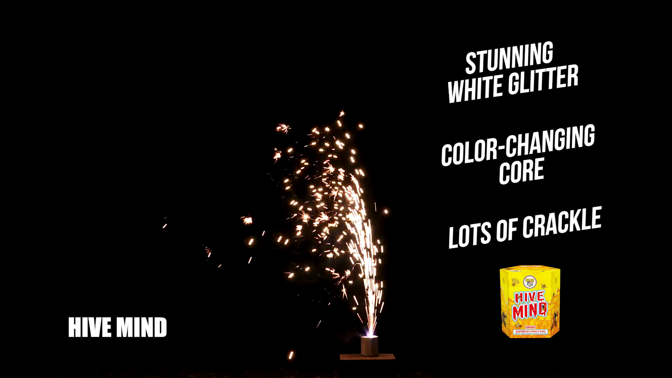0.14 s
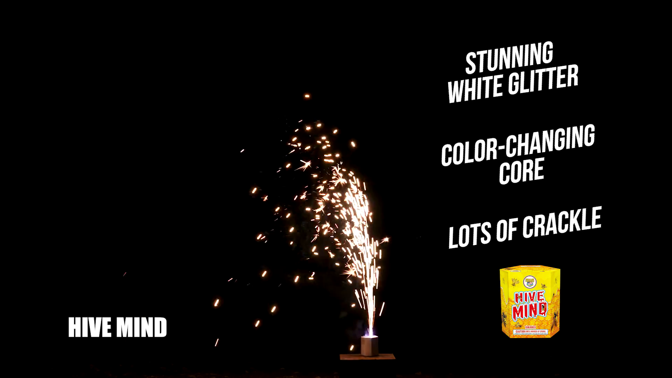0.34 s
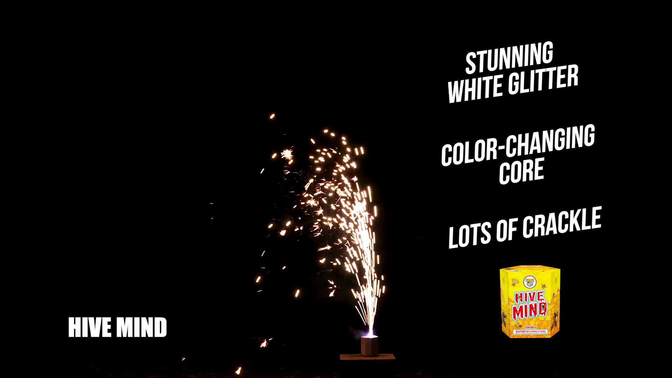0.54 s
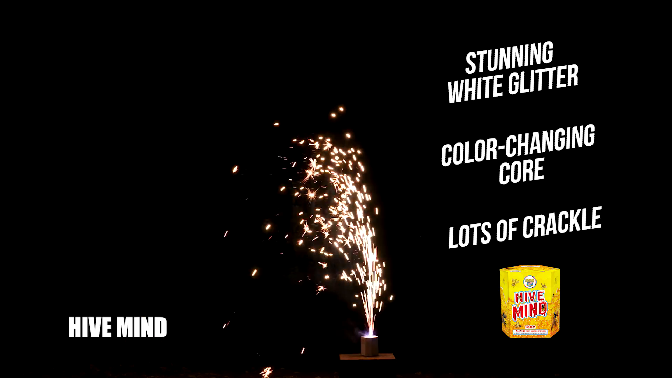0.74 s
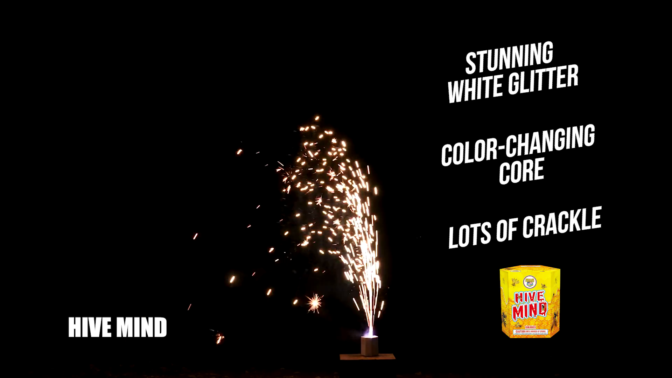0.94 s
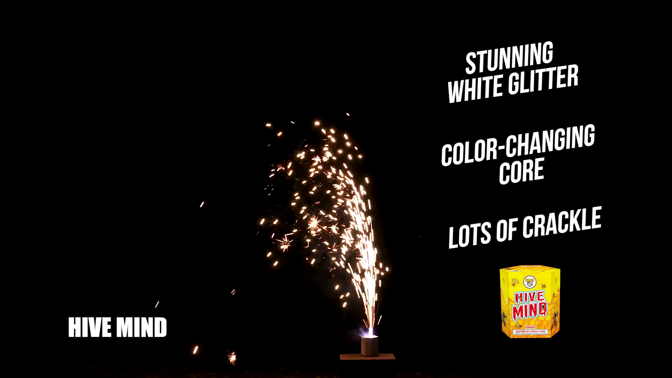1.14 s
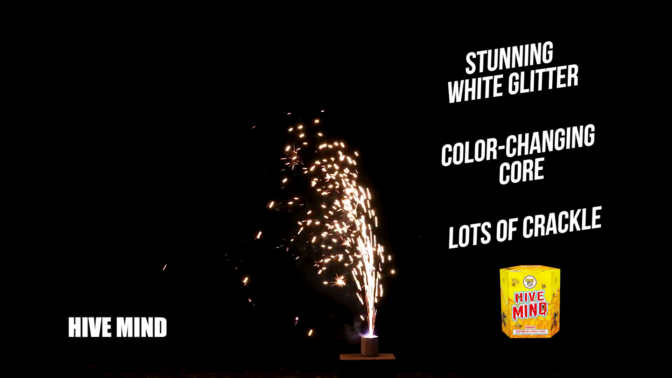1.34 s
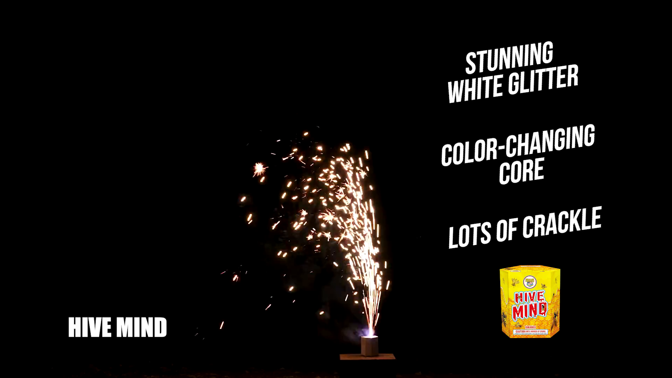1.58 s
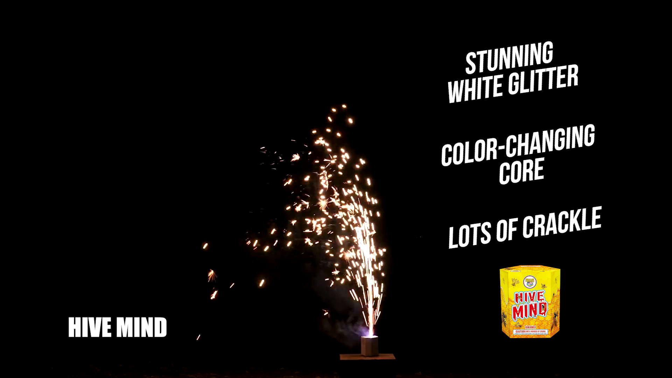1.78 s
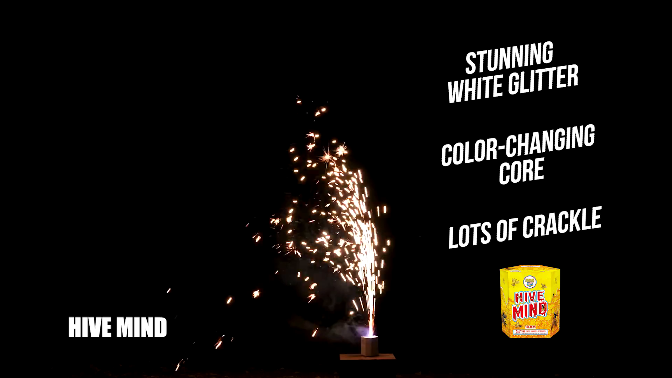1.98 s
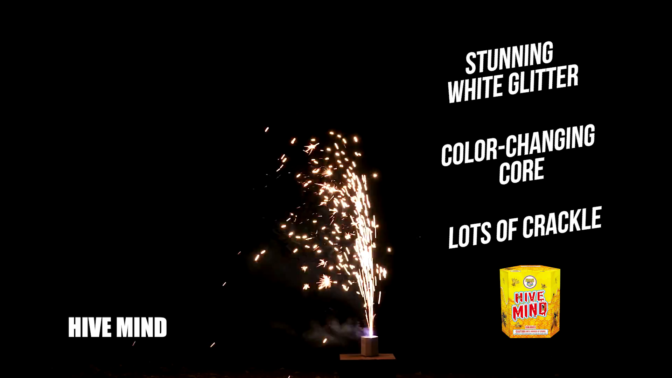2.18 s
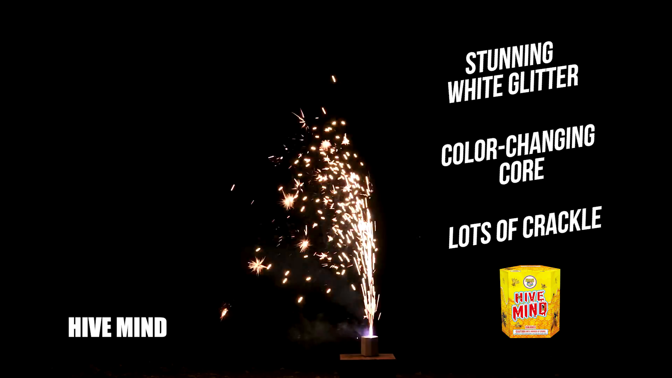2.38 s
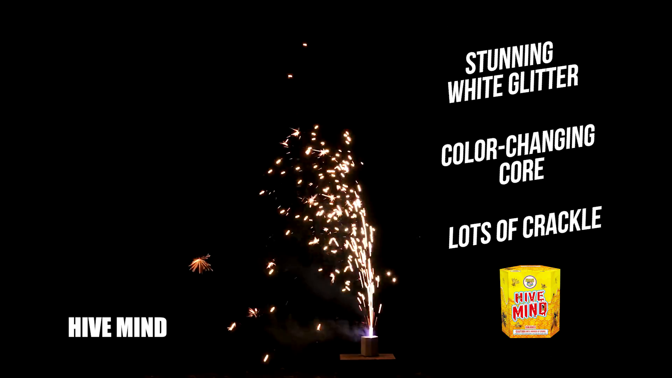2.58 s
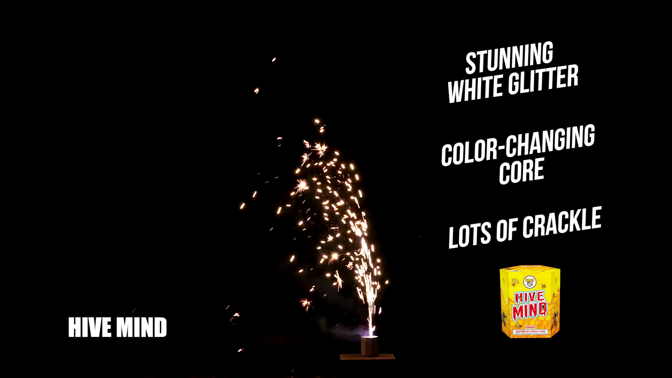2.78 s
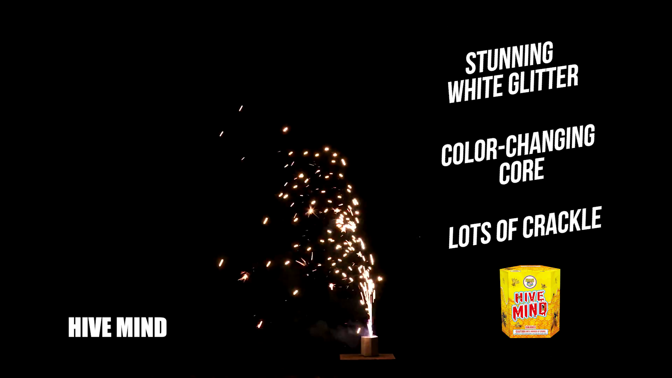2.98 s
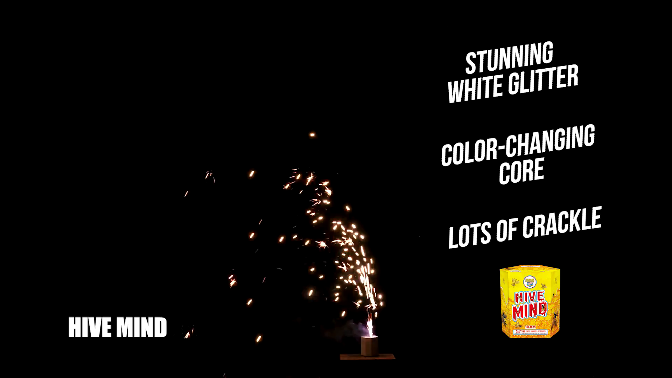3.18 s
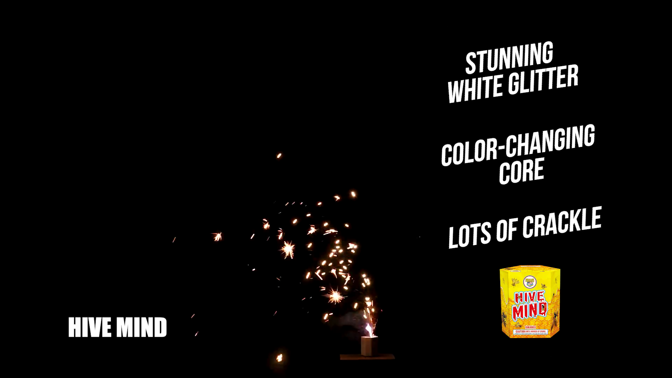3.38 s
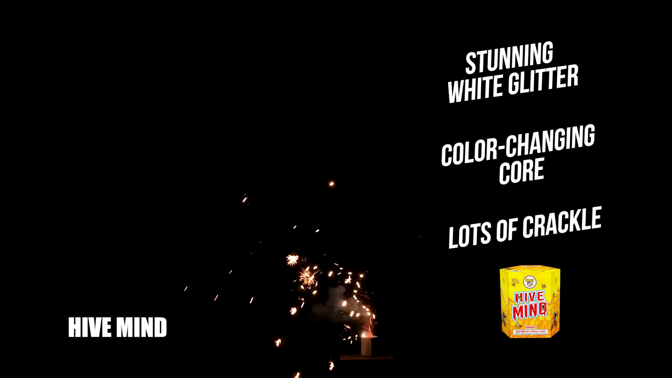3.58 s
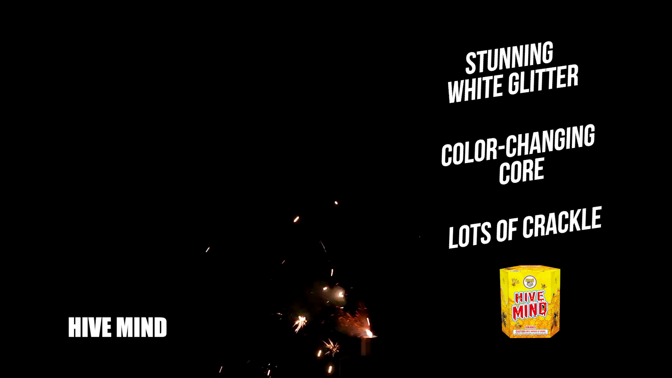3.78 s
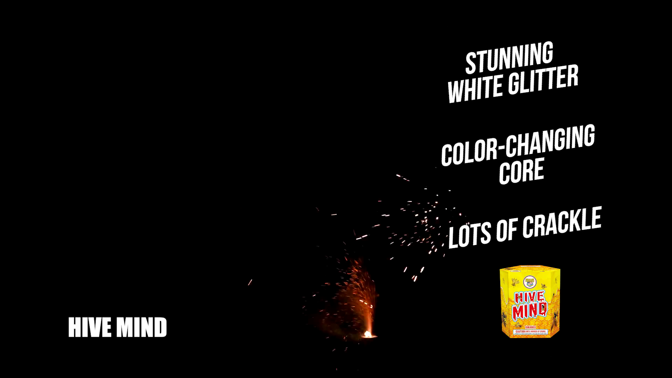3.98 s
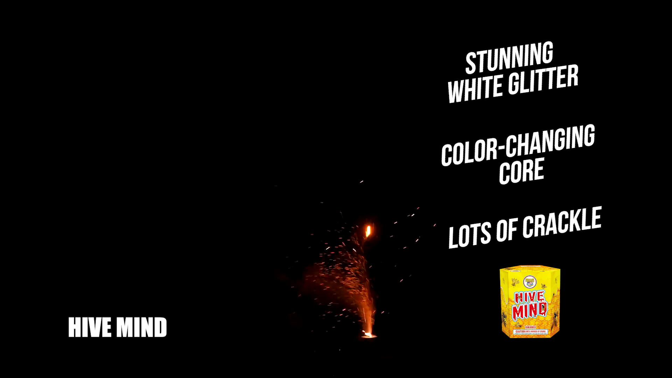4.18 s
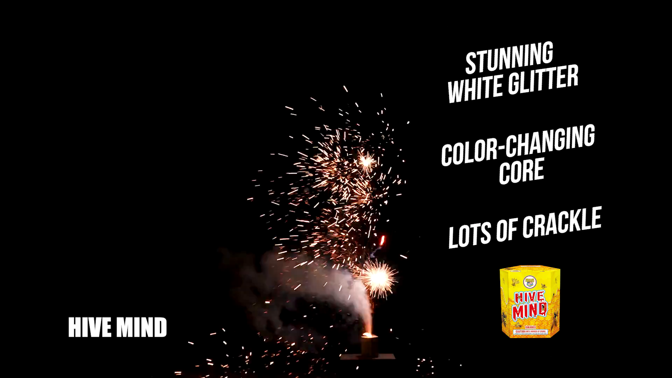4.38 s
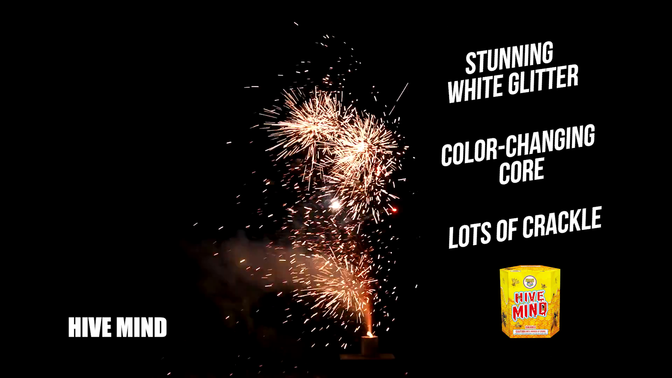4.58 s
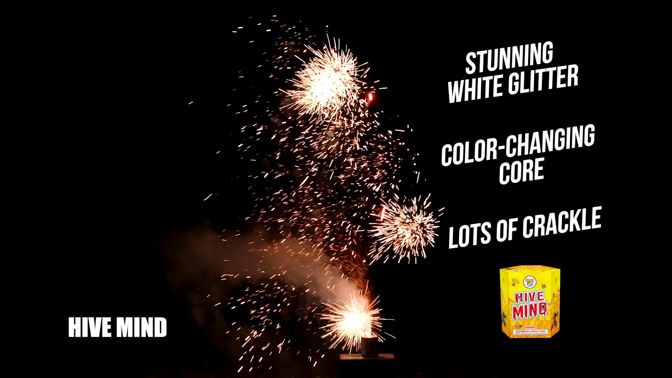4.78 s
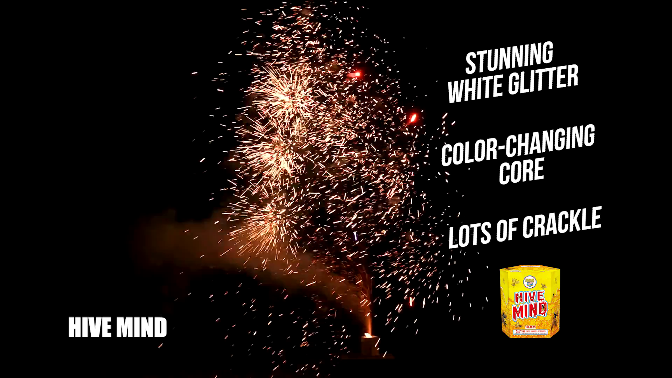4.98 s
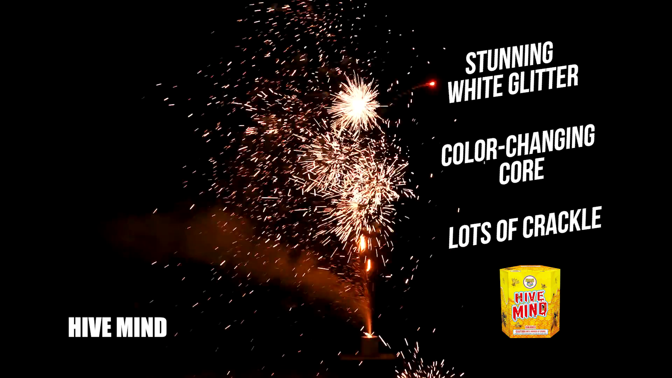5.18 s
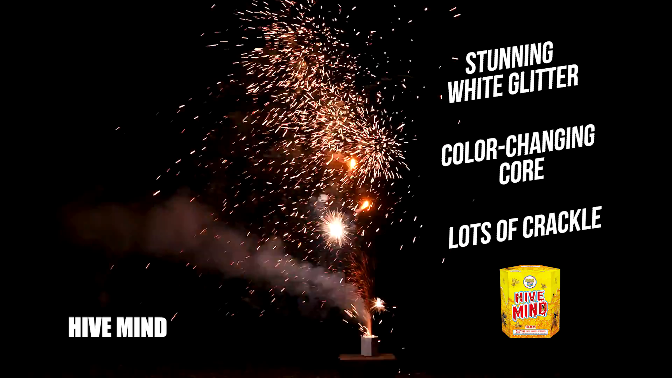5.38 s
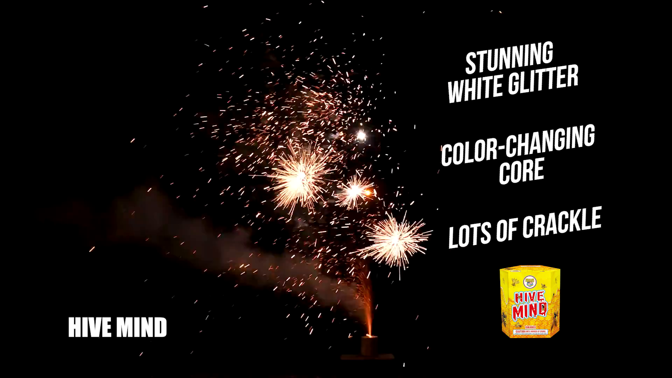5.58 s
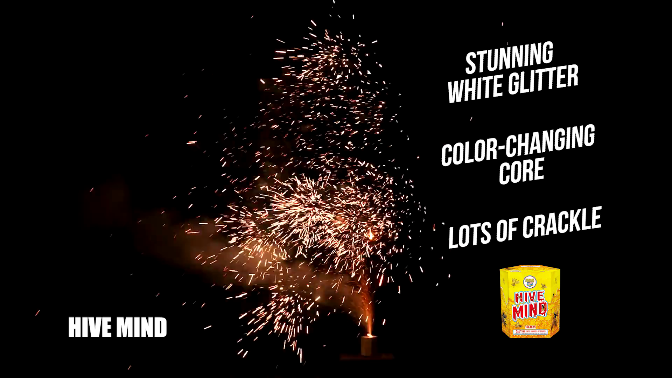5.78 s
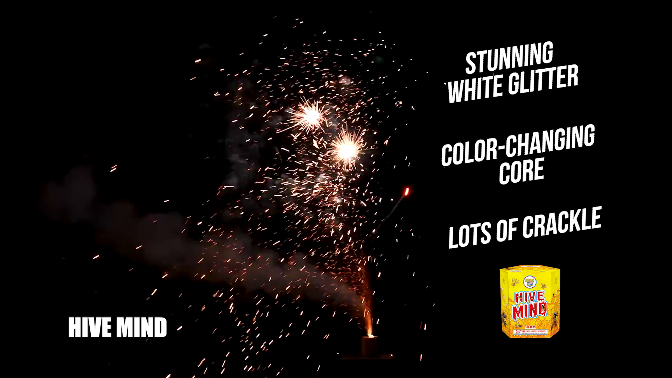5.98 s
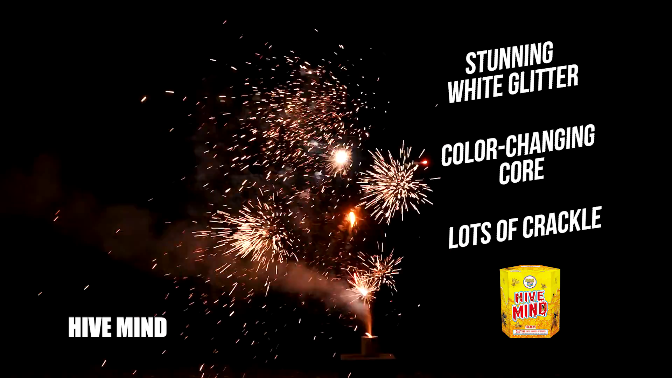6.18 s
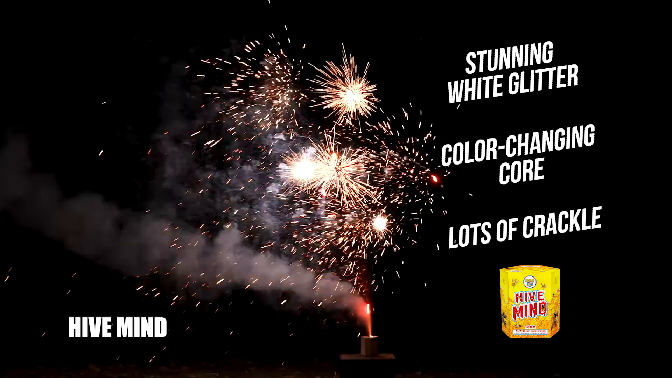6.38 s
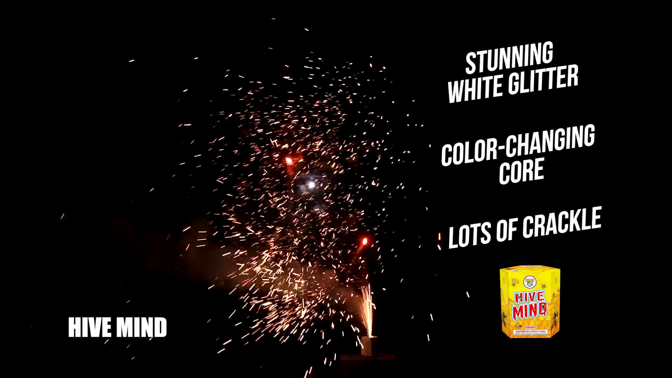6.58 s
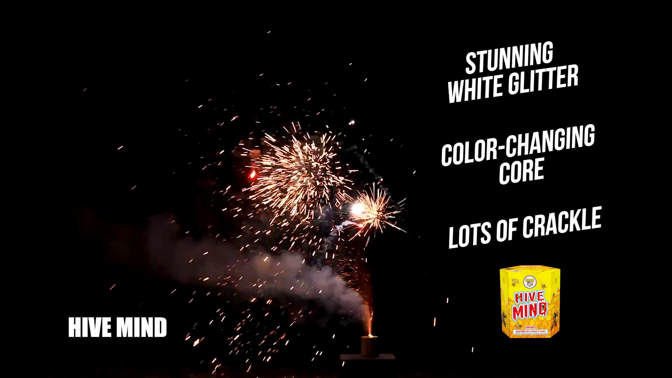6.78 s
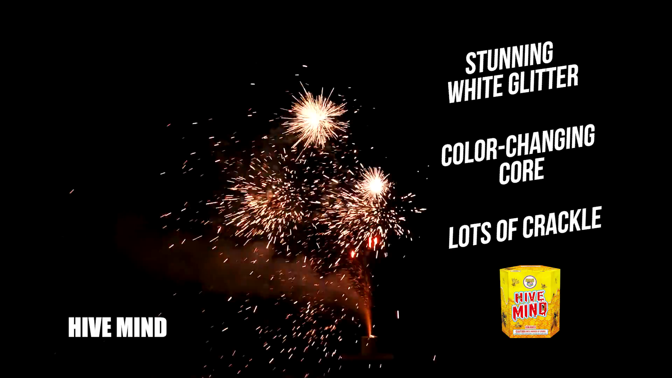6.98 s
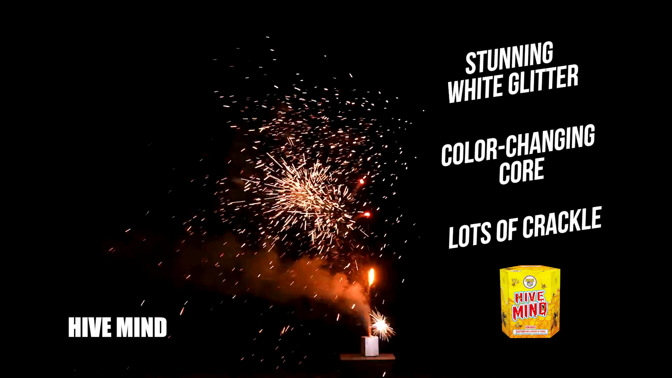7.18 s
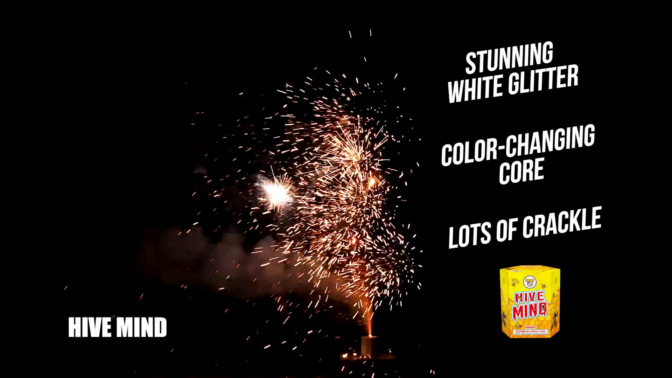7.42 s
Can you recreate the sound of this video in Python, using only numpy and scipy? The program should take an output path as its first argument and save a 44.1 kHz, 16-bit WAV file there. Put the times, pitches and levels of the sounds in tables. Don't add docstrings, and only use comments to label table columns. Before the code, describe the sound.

Outdoors at night, a ground fountain firework a few metres away roars and hisses steadily, peppered with fine snapping sparks. The jet weakens, sputters and dies to scattered ticks. After a brief lull a soft puff comes, then a second charge erupts in rapid bursts of sharp, dry crackling with small thumps, over a weaker hiss. Light wind rumbles beneath. Close stereo pickup, slightly louder on the left.

```python
import sys
import numpy as np
from scipy import signal
from scipy.fft import rfft, irfft
from scipy.io import wavfile
from scipy.ndimage import uniform_filter1d

SR = 44100
rng = np.random.default_rng(int(sys.argv[2]) if len(sys.argv) > 2 else 0)


def decibels_to_gain(level_db):
    exponent = np.asarray(level_db, float) / 20
    return 10 ** exponent


def output_pcm(signal):
    pcm = np.clip(np.atleast_2d(signal).T, -1, 1) * 32767
    wavfile.write(sys.argv[1], SR, np.round(pcm).astype(np.int16))


N = 328545


def evened(x):
    return x / np.sqrt(np.mean(x ** 2) + 1e-20)


def read(points, hz):
    f, value = np.transpose(points)
    return np.interp(np.log(hz + 1), np.log(f + 1), value)


def add(mix, s, sound):
    part = mix[round(s * SR):][:len(sound)]
    part += sound[:len(part)]


# f/Hz, correlation [0..1]
LIKENESS = [(60, 0.74), (180, 1), (550, 1), (1650, 1), (4970, 0.87), (15000, 0.099)]


def noise(spectrum, patchy_db, flicker_db, size=512):
    frames, hz = 4 * N // size + 5, np.fft.rfftfreq(size, 1 / SR)
    a, b, c, d, patches = rng.standard_normal((frames, len(hz), 5)).T
    flicker = evened(uniform_filter1d(patches[0], size=3))
    patches = uniform_filter1d(patches, size=7, axis=0)
    patches = evened(uniform_filter1d(patches, size=16, axis=1))
    same = np.clip(read(LIKENESS, hz), -1, 1)[:, None]
    left = a + 1j * b
    right = same * left + np.sqrt(1 - same ** 2) * (c + 1j * d)
    level_db = read(spectrum, hz)[:, None] + patchy_db * patches + flicker_db * flicker
    stereo = np.array([left, right]) * decibels_to_gain(level_db)
    return evened(signal.istft(stereo, nperseg=size, noverlap=3 * size // 4)[1][:, :N])


def pops(s, size, shock_ms, damping=1, bounce_ms=0.2, spread=0.067, bounce_db=-7.0, count=4, stay=1):
    at = np.clip(np.round(s * SR).astype(int), 0, N - 1)
    place = rng.integers(0, count, N)[at // stay]
    out = np.zeros((2, N))
    jw = 2j * np.pi * np.fft.rfftfreq(1024, 1 / SR)
    for k, (u, v, w) in enumerate(rng.uniform(-1, 1, (count, 3))):
        tau = shock_ms / 1000 * (1 + 0.097 * u)
        shock = jw * tau / (1 + 2 * damping * jw * tau + (jw * tau) ** 2)
        bounce_s = bounce_ms / 1000 * (1 + spread * v) * np.array([[1], [0.95 + 0.14 * w]])
        bounced = shock * (1 + decibels_to_gain(bounce_db) * np.exp(-jw * bounce_s))
        early_s = np.array([[0], [0.15 + 2 * spread * w]]) / SR
        wave = irfft(bounced * np.exp(jw * (early_s - 16 / SR)))
        train = np.bincount(at, size * (place == k), N)
        out += signal.oaconvolve(train[None], wave / wave[0].max(), axes=1)[:, 17:N + 17]
    return out


# f/Hz, level/dB
WIND_SPECTRUM = [(3, -7), (11, 10), (25, 1), (50, -16.5), (150, -25.5), (400, -21), (900, -41)]
WIND_DB = -43.5
HUM_HZ, HUM_DB = 60.5, -62.0


def wind():
    t, hz = np.arange(N) / SR, np.fft.rfftfreq(N, 1 / SR)
    a, b, lumps = rng.standard_normal((N, 3)).T
    gusts = evened(irfft(rfft([a, a + 0.88 * b]) * decibels_to_gain(read(WIND_SPECTRUM, hz)), N))
    lumps = evened(irfft(rfft(lumps) * (hz < 5), N))
    hum = np.sin(2 * np.pi * HUM_HZ * t + 0.5 * lumps)
    passing_db = 6.5 - 4.9 * np.minimum(abs(t - 2.35), 2)
    return decibels_to_gain(WIND_DB + 3.2 * lumps) * gusts + decibels_to_gain(HUM_DB + passing_db) * hum


# t/s, length/ms, level/dB
PUFFS = [
    (3.894, 16, -42.5),
    (6.689, 21, -37.5),
]


def puffs():
    t = np.arange(N) / SR
    swell = sum(decibels_to_gain(db) * np.exp(-0.5 * ((t - s) * 4000 / ms) ** 2) for s, ms, db in PUFFS)
    return swell * noise([(60, -7.0), (300, -1.0), (1500, -13.0), (4000, -31.0)], 0, 0)


FALLEN_S = 3.4
FIZZ_LEAD_S = 0.17
# t/s, level/dB
JET_PRESSURE = [(0., -40), (2.73, -42), (2.95, -45.5), (3.14, -55.5), (3.3, -59.5), (3.42, -62.5),
                (3.6, -61.5), (3.7, -58), (3.79, -68), (3.86, -63), (3.94, -57), (4.05, -54.5), (4.4, -50),
                (5.08, -50.5), (5.8, -52.5), (7.45, -51.5)]
# f/Hz, level/dB
ROAR = [(88, -45), (150, -17.5), (400, -5), (620, -3.5), (1150, -0.5), (1450, -6), (2350, -8), (3300, -17),
        (4600, -31)]
# f/Hz, level/dB
FIZZ = [(2000, -53), (2900, 0.5), (3900, -3.5), (6900, 4.5), (8900, -3.5), (10800, -4), (13000, -11),
        (15700, -23), (16100, -50.)]
# f/Hz, level/dB
TUBE = [(300, -20), (400, -3), (480, 14.5), (570, 2), (750, -46)]


def jet():
    s, pressure_db = np.transpose(JET_PRESSURE)
    t = np.arange(N) / SR
    roar_db = np.interp(t, s, pressure_db)
    roar = decibels_to_gain(roar_db) * noise(ROAR, 0.63, 0.49)
    tube_db = np.interp(t - 0.17, s, pressure_db) - 11.0 - 1.1 * (t > 3.7)
    tube = decibels_to_gain(tube_db) * noise(TUBE, 0.29, 0, size=2048)
    ahead_db = np.interp(t + FIZZ_LEAD_S * (t < FALLEN_S), s, pressure_db)
    fizz = decibels_to_gain(np.minimum(roar_db, ahead_db)) * noise(FIZZ, 1.0, 0.97)
    return roar + tube + fizz


# t/s, rate [sparks per s], level/dB
SMALL_SPARKS = [
    (0., 273, -34.5),
    (2.55, 210, -34),
    (2.65, 250., -54),
    (3.25, 120, -50),
    (3.4, 87, -63),
    (7.45, 60., -57.),
]
# t/s, peak level/dB
SPITS = [(0.7557, -20), (0.8172, -19), (0.87, -20), (1.0517, -19), (1.2376, -18), (1.2789, -20),
         (1.3058, -20), (1.5024, -19), (1.7288, -20), (1.9931, -20), (2.4024, -19), (2.5015, -19)]
# t/s, peak level/dB
SPUTTER = [(2.6279, -23), (2.6534, -25), (2.6604, -24), (2.6848, -23), (2.686, -25), (2.7123, -22),
           (2.7131, -25), (2.7356, -22), (2.7619, -25), (2.7665, -24), (2.7678, -25), (2.7751, -19),
           (2.7868, -21), (2.8128, -25), (2.8173, -25), (2.8314, -22), (2.8605, -21), (2.8804, -25),
           (2.9075, -23), (2.9395, -25), (2.9538, -25), (2.973, -26), (2.9813, -25), (3.0094, -24),
           (3.0216, -28), (3.0259, -21), (3.0564, -22), (3.0716, -26), (3.0844, -32), (3.1012, -22),
           (3.121, -22), (3.1244, -20), (3.1299, -24), (3.147, -22), (3.152, -29), (3.1662, -21),
          (3.1764, -23), (3.1793, -19), (3.2071, -26), (3.2169, -24), (3.2177, -17), (3.2375, -26),
          (3.2399, -28), (3.2548, -22), (3.2786, -31), (3.3344, -27), (3.3495, -24), (3.3521, -22),
          (3.3596, -31), (3.4366, -24), (3.4575, -25), (3.501, -24), (3.5306, -32), (3.6828, -33),
          (3.6922, -27), (3.6951, -29), (3.7216, -28), (3.7324, -24), (3.8205, -29), (3.8959, -31)]
# t/s, peak level/dB
TICKS = [
    (3.3204, -38),
    (3.483, -38),
    (3.5721, -40),
    (3.6758, -36),
    (3.744, -39),
    (3.756, -40),
    (3.7697, -39),
    (3.8634, -38),
    (4.0502, -34),
]


def sparks():
    t, (s, rate, db) = np.arange(N) / SR, np.transpose(SMALL_SPARKS)
    chance, luck = rng.random((N, 2)).T
    small = chance < np.interp(t, s, rate) / SR
    small_size = decibels_to_gain(np.interp(t, s, db) - 3.65 * np.log(1 - 0.965 * luck))[small]
    big_s, big_db = np.transpose(SPITS + SPUTTER + TICKS)
    s = np.r_[t[small], big_s]
    size = np.r_[small_size, decibels_to_gain(big_db - 1.5)]
    early = pops(s, size * (s < FALLEN_S), 0.044, 0.6, 0.172, 0.06, -4.0, count=8)
    late = pops(s, size * (s >= FALLEN_S), 0.046, 0.96, bounce_ms=0.15, spread=0.2, bounce_db=0, count=3)
    pull_back = pops(s, size, 0.13, 1.0)
    return early + decibels_to_gain(-0.5) * late + decibels_to_gain(2.5) * pull_back


THUMP_DB, USUAL_DB, BRIGHTER_PER_DB, HEAVIER_DB, USUAL_MS = -7, -29, 0.53, 0.5, 10
TRAIL_MS, TRAIL_DB = 8.1, -20.5
# t/s, length/ms, level/dB
STARS = [(3.9872, 9.6, -32), (4.3391, 5.9, -23.5), (4.3525, 7.2, -37), (4.4236, 1.45, -18),
         (4.4275, 9.5, -44), (4.4367, 7.6, -29.5), (4.4552, 15.4, -33.5), (4.5009, 8.9, -28),
         (4.5337, 5.3, -25.5), (4.5421, 32.3, -30.5), (4.5864, 10.6, -26.5), (4.6056, 13.4, -31.5),
         (4.6472, 10.7, -31), (4.6704, 19, -27.5), (4.7105, 11, -31), (4.7209, 32, -31),
         (4.753, 18.4, -31.5), (4.786, 3.3, -32), (4.826, 8, -29.5), (4.854, 7.9, -31),
         (4.867, 31.2, -27.5), (4.9124, 33, -26), (4.9464, 17, -25), (4.969, 5, -33),
         (4.979, 14.6, -27), (4.9967, 24, -28.5), (5.03, 18.6, -31), (5.055, 27, -28.5),
         (5.1231, 12.7, -26.5), (5.1426, 11.7, -29.5),
         (5.1674, 8.3, -28), (5.2157, 15, -35), (5.2415, 29, -27.5), (5.275, 25.5, -29.5),
              (5.314, 11.5, -25.5), (5.35, 11, -28), (5.365, 21, -27.5), (5.3908, 17.6, -29),
              (5.4182, 15.2, -26.5), (5.4527, 18, -30.5), (5.503, 14.2, -27.5), (5.537, 7.9, -28),
              (5.5555, 16.8, -32), (5.5787, 13.4, -26.5), (5.6196, 16.7, -32), (5.6527, 2, -27),
              (5.6866, 8.8, -25.5), (5.702, 5.6, -25.5), (5.7114, 14, -33), (5.7468, 1.6, -38),
              (5.7644, 14.8, -26.5), (5.7857, 11.2, -27), (5.8107, 3.6, -29), (5.8204, 21, -32),
              (5.843, 13.3, -26.5), (5.868, 12.3, -30.5), (5.937, 17.8, -25.5), (5.9942, 6.6, -28),
              (6.0431, 6.1, -27), (6.0967, 10, -31),
         (6.1129, 2.7, -30.5), (6.155, 14.3, -24.5), (6.171, 13.6, -26.5), (6.2178, 4.5, -27),
              (6.2612, 12.6, -28.5), (6.277, 4.9, -28.5), (6.3, 3.4, -27), (6.3077, 20.5, -28),
              (6.348, 10.7, -25), (6.3745, 8.7, -28.5), (6.4233, 28, -27), (6.488, 6.2, -22.5),
              (6.5004, 49, -29), (6.5624, 3.8, -27), (6.62, 10.3, -25), (6.714, 4.6, -28.5),
              (6.7384, 9.2, -30.5), (6.7625, 9.3, -28), (6.791, 4.3, -21), (6.863, 9, -23),
              (6.8885, 3.2, -24), (6.9105, 33.2, -29.5), (6.943, 10, -43), (6.9534, 4.6, -29.5),
              (6.9957, 2.1, -30.5),
         (7.037, 10, -28), (7.0574, 4.5, -29), (7.0872, 9.8, -31.5), (7.104, 7, -29.5),
              (7.122, 17, -31), (7.1672, 7.9, -32), (7.1759, 2.5, -26), (7.1944, 10.6, -31),
              (7.263, 19.5, -29), (7.3071, 22, -30.5), (7.3325, 11.8, -30), (7.4019, 8.8, -35.5),
              (7.415, 6.8, -32.5), (7.4421, 6.7, -28.5)]
# t/s, length/ms, extra level/dB
HEAVY_STARS = [(3.988, 12, -2.5), (4.3534, 8, 14), (4.67, 18, 2), (4.745, 6, 9), (4.979, 14, 4.5),
               (5.1426, 13, 3.5), (5.2415, 26, -0.5), (5.453, 17, 4), (5.8254, 18, -9), (6.172, 13, 3.5),
               (6.2765, 6, 7.5), (6.3074, 20, 2.5), (6.3759, 7, 4.5), (6.6193, 12, 2.5), (6.91, 33, 2.5),
               (7.1225, 16, -2), (7.3077, 22, -5)]
# t/s, peak level/dB
CRACKS = [(4.3408, -8), (4.4241, -7), (4.5895, -10), (4.6716, -7), (4.6762, -8), (4.7499, -9), (4.9142, -9),
          (4.9526, -4), (4.9618, -7), (4.9908, -9), (4.9978, -7), (5.0403, -7), (5.1248, -3), (5.1673, -6),
          (5.6868, -9), (5.7473, -10), (5.9381, -5), (6.4254, -6), (6.4264, -6), (6.4475, -8), (6.4888, -3),
          (6.4915, -8), (6.5403, -8), (6.562, -10), (6.6237, -6), (6.7148, -10), (6.7406, -11),
          (6.8629, -9), (7.1336, -10), (7.176, -4)]


def stars():
    level, thump, weight_db = np.zeros(N), np.zeros(N), np.zeros(N)
    for s, ms, db in STARS:
        trail = np.linspace(1, 0, round(TRAIL_MS * SR / 1000))
        add(level, s + ms / 1000, decibels_to_gain(db + TRAIL_DB) * trail)
        age = np.linspace(0, 1, round(ms * SR / 1000))
        add(level, s, decibels_to_gain(db + 1.5 - 4.3 * age ** 2.86))
        thump_db = THUMP_DB - BRIGHTER_PER_DB * (db - USUAL_DB) + HEAVIER_DB * np.log2(ms / USUAL_MS)
        add(thump, s, np.full(len(age), decibels_to_gain(thump_db)))
    for s, ms, db in HEAVY_STARS:
        add(weight_db, s, np.full(round(ms * SR / 1000), float(db)))
    thump = thump * decibels_to_gain(weight_db)

    chance, luck, clumps = rng.random((N, 3)).T
    clumps = evened(uniform_filter1d(clumps - 0.5, size=70))
    grain = (chance < 5000 / SR) & (level > 0)
    grain_db = 3.5 + 2.3 * clumps - 3.4 * np.log(1 - 0.975 * luck)
    crack_s, crack_db = np.transpose(CRACKS)
    at = np.r_[np.flatnonzero(grain), np.round(crack_s * SR).astype(int)]
    size = np.r_[(level * decibels_to_gain(grain_db))[grain], decibels_to_gain(crack_db + 2.0)]

    sharp = pops(at / SR, size, 0.033, 0.5, 0.19, 0.4, -8.5, count=16, stay=150)
    push = np.minimum(size, 10 * level[at]) * np.minimum(thump[at], 3)
    return sharp + decibels_to_gain(-4.5) * pops(at / SR, push, 0.2) + decibels_to_gain(-23.5) * pops(at / SR, push, 1.26)


def scene():
    return wind() + puffs() + jet() + sparks() + stars()


def low_pass(x):
    return signal.sosfilt(signal.butter(12, 17000, fs=SR, output="sos"), x)


# f/Hz, level/dB
MIC = [(25, -13.5), (60, -3.5), (140, 2.5), (1000, 0), (2200, 0), (4000, -5), (6500, -4), (11000, -2.5),
       (15000, -7.5)]
# f/Hz, level/dB
LEFT_LEAN = [(60, 2), (180, 4), (550, 4.5), (1650, 3.5), (4970, 3), (15000, 0)]
# f/Hz, gain [linear]
BAND_EDGE = [(0, 1), (15850, 1), (16150, .16), (16800, .1), (16950, 0), (SR / 2, 0)]


def record(dry):
    hz = abs(np.fft.fftfreq(8192, 1 / SR))
    log_gain = np.log(decibels_to_gain(read(MIC, hz) + np.outer([0.5, -0.5], read(LEFT_LEAN, hz))))
    minimum_phase = np.exp(np.conj(signal.hilbert(log_gain)))
    taps = np.fft.ifft(minimum_phase).real[:, :4096]
    coloured = signal.oaconvolve(dry, taps, axes=1)[:, :N]
    edge = signal.firwin2(401, *np.transpose(BAND_EDGE), fs=SR)
    mix = signal.oaconvolve(coloured, edge[None], "same", axes=1)
    return low_pass(mix)


dry = scene()
out = record(dry)
output_pcm(out)
```